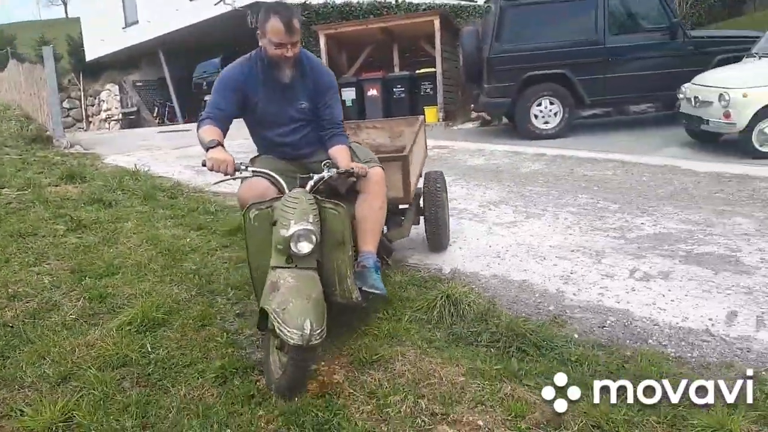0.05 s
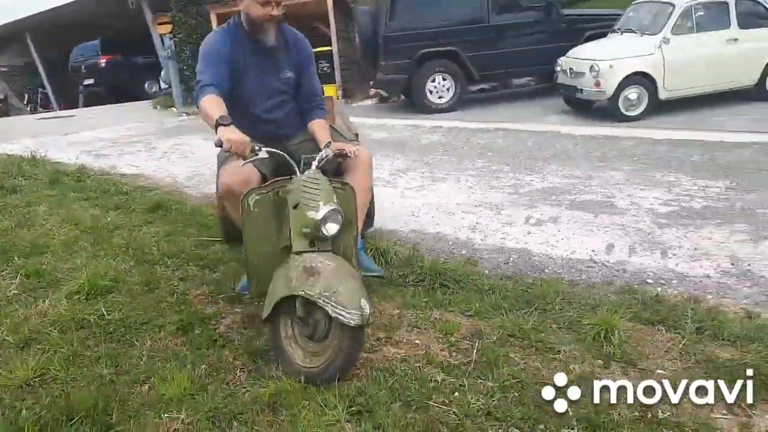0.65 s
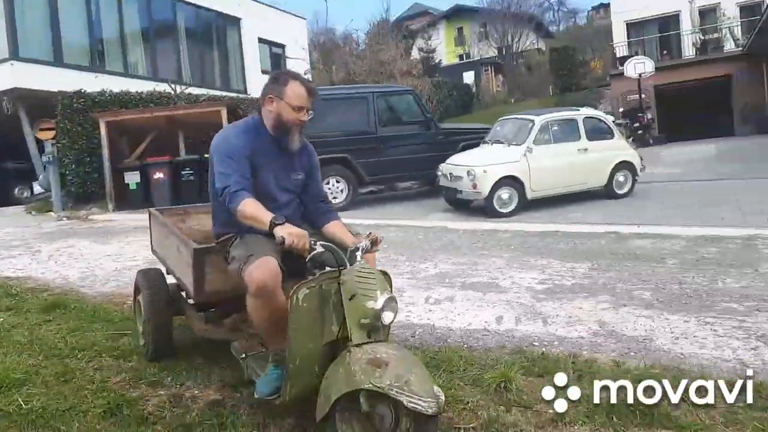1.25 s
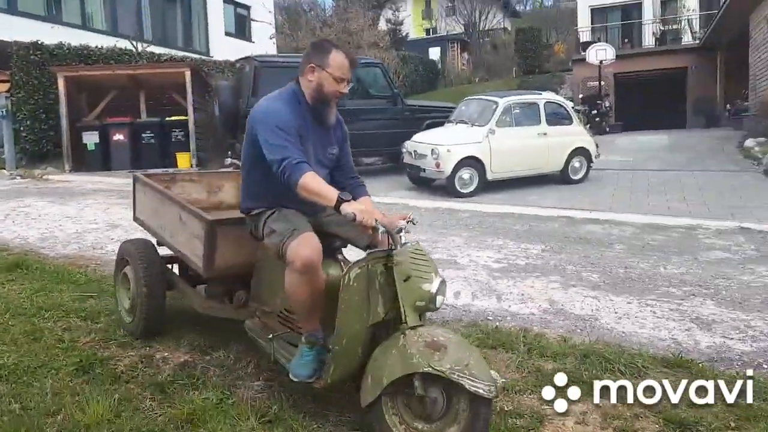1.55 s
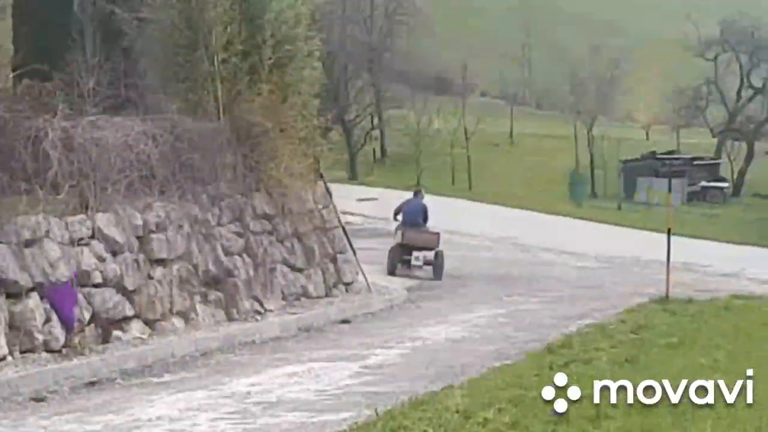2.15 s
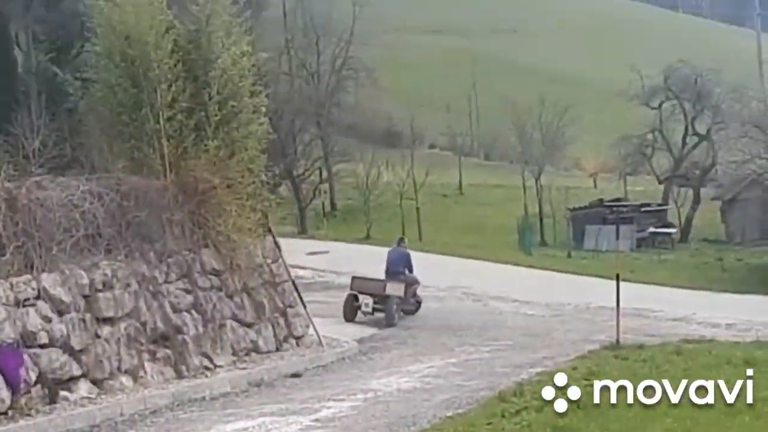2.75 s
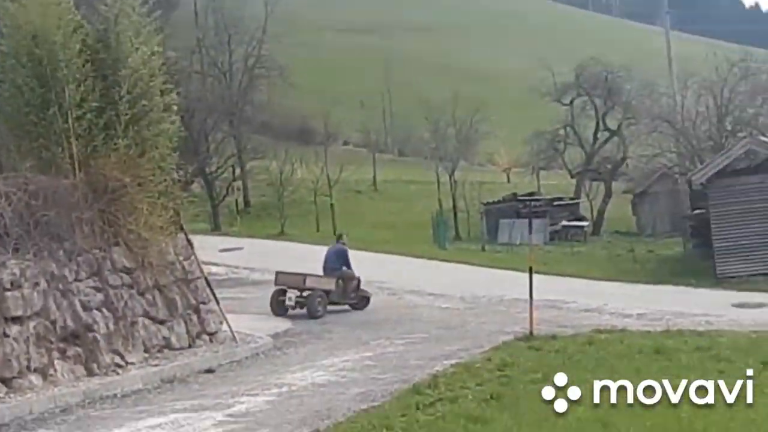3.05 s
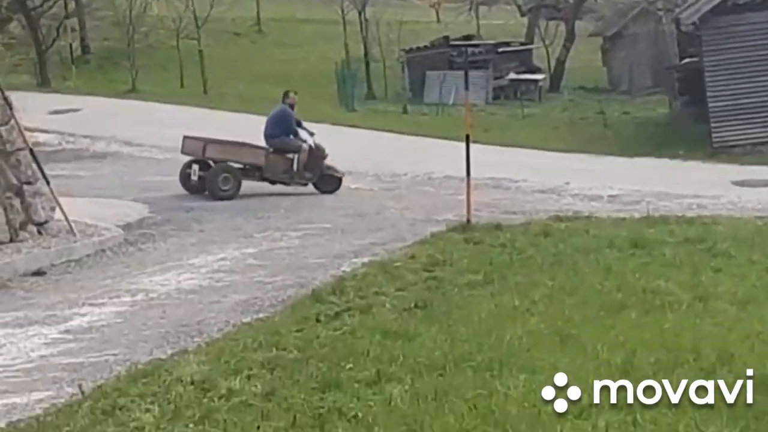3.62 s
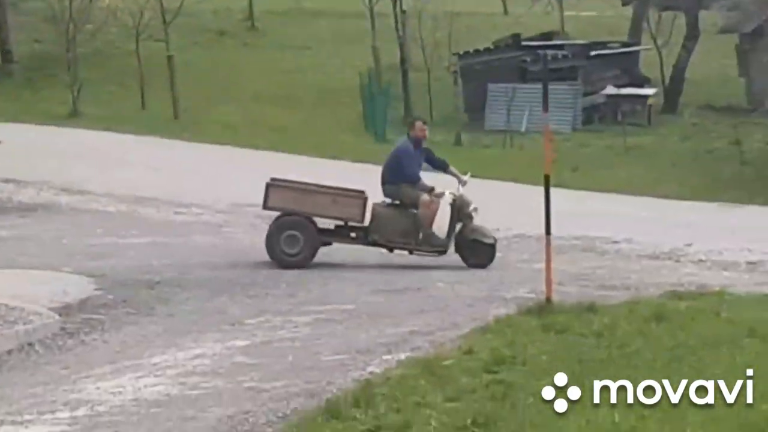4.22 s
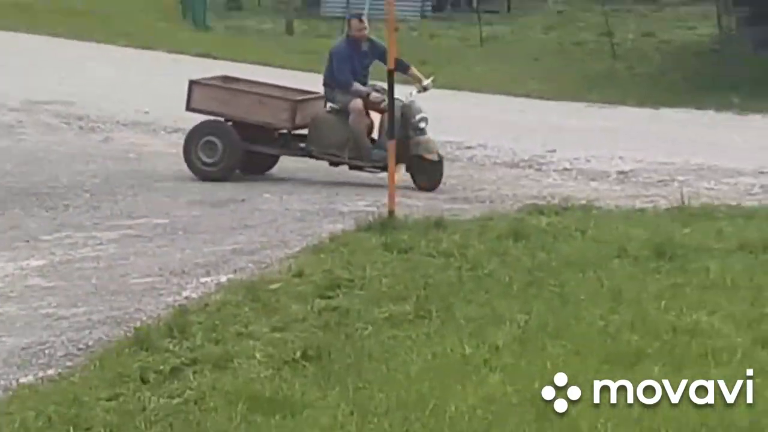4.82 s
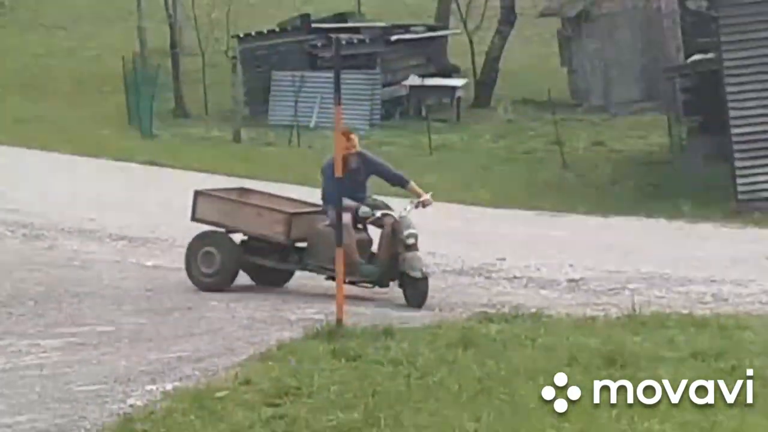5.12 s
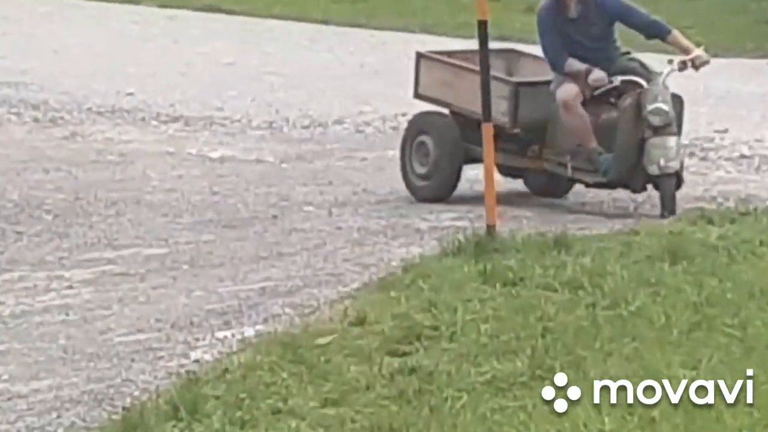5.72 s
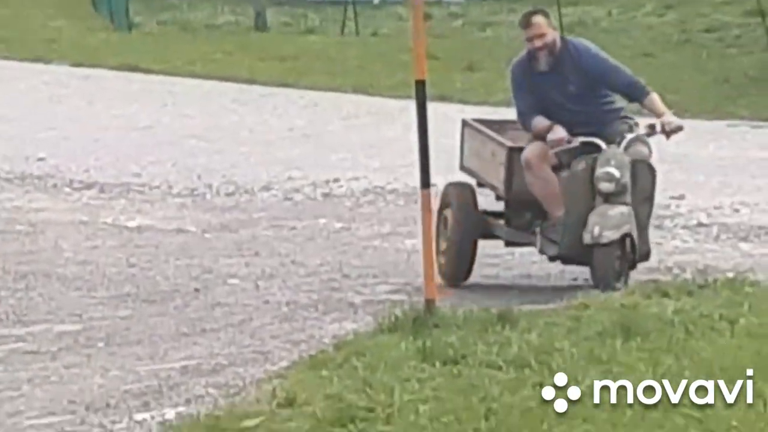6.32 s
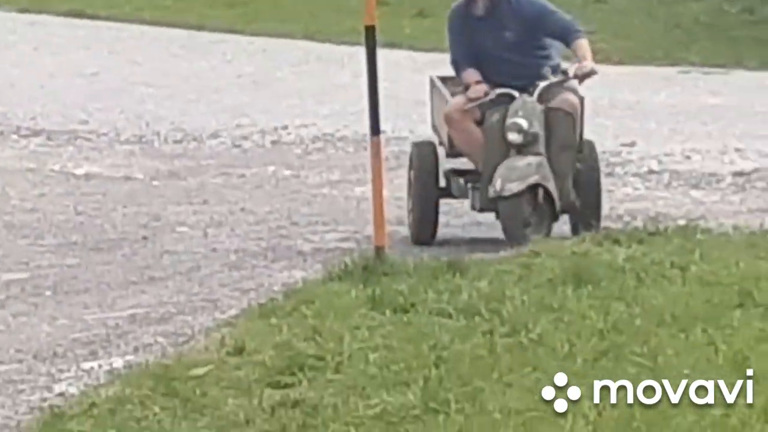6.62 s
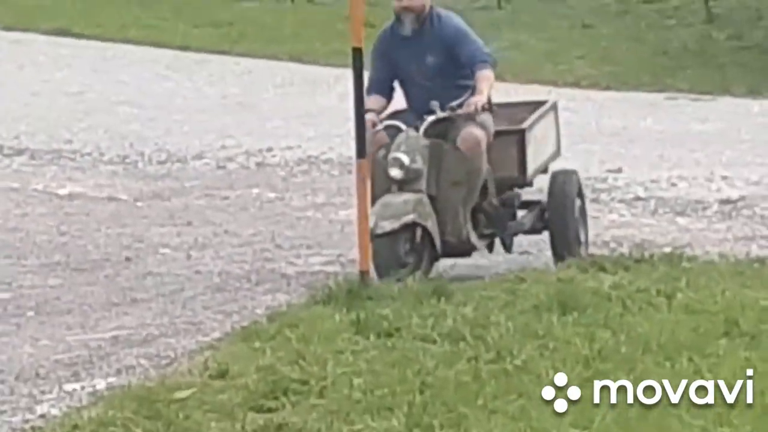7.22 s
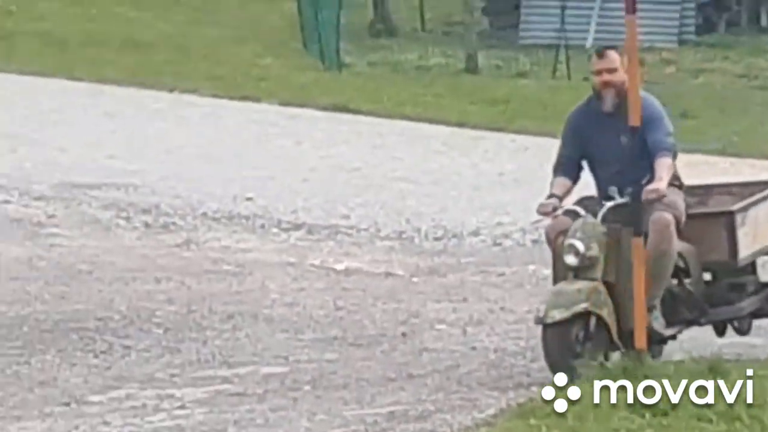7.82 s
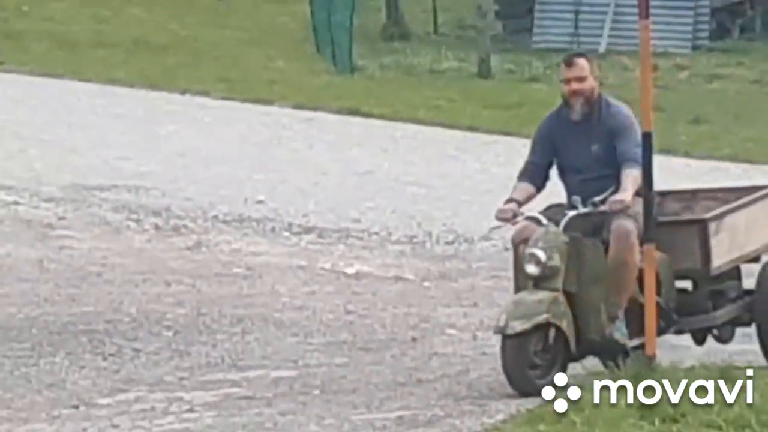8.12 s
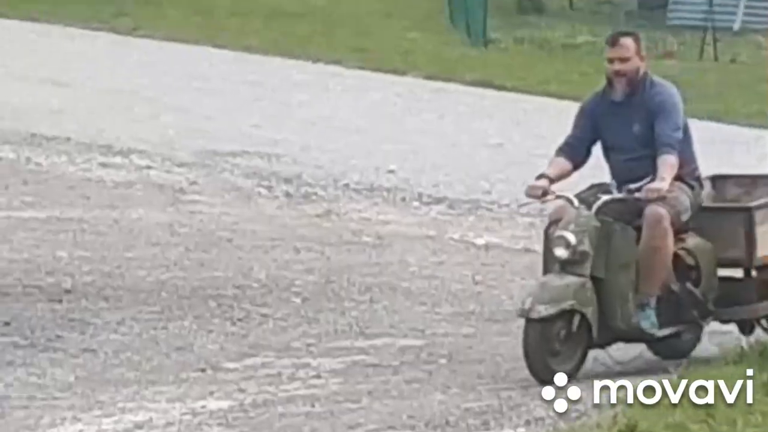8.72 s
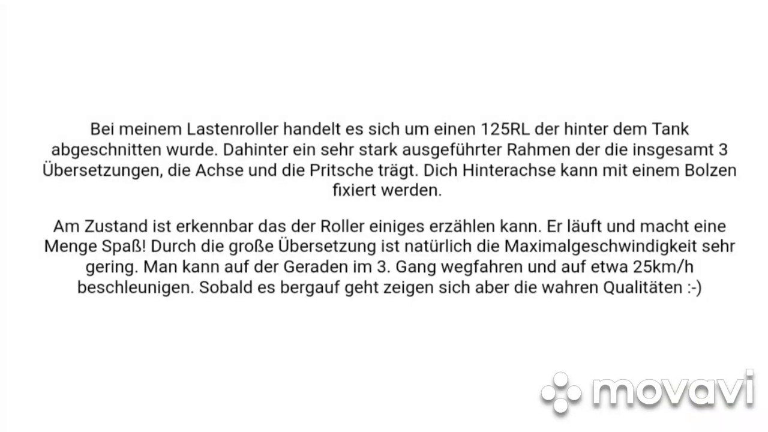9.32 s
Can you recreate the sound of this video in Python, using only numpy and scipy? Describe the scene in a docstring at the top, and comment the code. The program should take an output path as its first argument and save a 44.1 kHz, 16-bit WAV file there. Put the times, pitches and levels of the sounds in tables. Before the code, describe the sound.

An old two-stroke scooter putters and bangs close by, rattling, then is suddenly farther off, coasting on gravel and revving in bursts.

```python
"""An old single-cylinder two-stroke cargo scooter rolls off across a yard, two metres away. Off the
throttle it four-strokes: most turns of the crank only puff, and every few turns one bangs. The fan
hisses, the chain clatters, a loose panel clinks and a dry part squeals. At 2 s, abruptly, it is far down
the lane, coasting and turning round on gravel. From about 4.5 s it revs in little bursts, every turn
firing under the widest throttle, and from about 7 s it sounds nearer."""
import sys
import numpy as np
from scipy import signal
from scipy.fft import rfft, irfft, next_fast_len
from scipy.io import wavfile
from scipy.ndimage import uniform_filter1d, map_coordinates

SR = 44100
rng = np.random.default_rng(int(sys.argv[2]) if len(sys.argv) > 2 else 0)


def transcribe(u):
    """Save the signal u as a 16-bit wav file named by the first command-line argument.

    u: samples, shape (n,) or (channels, n), limited to [-1, 1]; the rate is SR.
    q: integer samples, one column per channel.
    """
    v = np.clip(np.atleast_2d(u).T, -1, 1)
    q = np.round(v * 32767).astype(np.int16)
    wavfile.write(sys.argv[1], SR, q)


N = 412335
T = np.arange(N) / SR
YARD_SPAN_S, LANE_SPAN_S = (0, 1.988), (1.988, 8.965)

# crank speed: (time [s], turns a second [Hz])
YARD_REVS = [(0, 56.7), (0.5, 55.6), (0.8, 57), (1.2, 53.87), (1.75, 45.6), (1.98, 44.9)]
LANE_REVS = [(2.0, 44.74), (2.39, 39.8), (2.56, 36.1), (3.01, 33), (3.14, 34.5), (3.28, 35), (3.76, 43.4),
             (4.1, 43.06), (4.28, 42.14), (4.38, 39.17), (4.58, 38.91), (4.72, 41.04), (5.05, 40.22),
             (5.22, 46.58), (5.42, 46.06), (5.55, 49.54), (5.76, 51.2), (5.92, 57.24), (6.21, 56.34),
             (6.65, 47.1), (6.89, 50.17), (7.09, 55.15), (7.22, 60.37), (7.45, 63.74), (7.59, 58.66),
             (7.76, 50.35), (7.92, 45.95), (8.05, 46.34), (8.33, 49.4), (8.62, 47.55), (8.8, 50.1),
             (8.95, 52)]
# bangs after a run of misses: (time [s], accent [dB])
YARD_BANGS = [(0.072, -3.5), (0.142, 0), (0.156, -1.5), (.21, 2.5), (.301, 2), (0.318, 4.5), (.412, 4),
              (0.486, 2), (0.539, 0), (.557, 0.5), (.575, 0.5), (.593, -5), (0.63, -4.5), (0.645, 1),
              (.699, 3), (.787, 3.5), (0.822, 1), (0.861, 2), (.877, -0.5), (0.95, 4.5), (1.04, 1),
              (1.099, -6), (1.115, 1.5), (1.189, -2), (1.209, -2.5), (1.303, 1.5), (1.377, 1.5), (1.417, 5),
              (1.438, 2.5), (1.516, 5), (1.578, 3), (1.62, -1.5), (1.641, 3.5), (1.704, 1.5), (1.725, -1),
              (1.79, 3), (1.838, 1.5), (1.86, -0.5), (1.905, 3.5), (1.931, 0)]
LANE_BANGS = [(2.0052, -1), (2.1145, 2.5), (2.2314, 2), (2.328, 6), (2.429, 5.5), (2.5372, 7.5),
              (2.6231, 3), (2.653, 4), (2.711, 2.5), (2.7725, 2.5), (2.804, -0.5), (2.895, 1), (2.927, 4),
              (3.013, 4.5), (3.1018, 2.5), (3.218, 1.5), (3.304, -0.5), (3.3872, 2.5), (3.46, 3),
              (3.485, 1), (3.561, 1), (3.632, -2.5), (3.7, -2), (3.722, -2), (3.791, 0), (3.882, -4.5),
              (4.089, -3), (4.115, -3.5), (4.229, -1.5), (4.326, -1.5), (6.2867, -0.5), (6.3603, -0.5),
              (6.419, -3), (6.5158, 2), (6.642, 3), (6.724, 1), (7.5561, -0.5), (7.7148, -1.5), (7.812, -4),
              (7.896, -1)]
# boom of the silencer body: (frequency [Hz], gain [dB])
YARD_SILENCER = [(30, -42), (60, -28), (110, -17), (160, -9), (220, 1), (280, 0), (360, -6), (450, -15),
                 (2400, -100)]
LANE_SILENCER = [(30, -55.5), (60, -37.5), (110, -27.5), (160, -7.5), (205, 0), (245, 8), (300, 6),
                 (335, 4), (380, -16), (440, -27), (600, -19.5), (2400, -100)]
# bark of the tailpipe: (frequency [Hz], gain [dB])
YARD_TAILPIPE = [(40, -50), (150, -25), (400, -3), (500, 0), (680, 4), (830, -1), (960, -18), (1300, -8),
                 (1750, -24.5), (3000, -32.5), (8000, -43)]
LANE_TAILPIPE = [(60, -52), (200, -33), (420, 0.5), (540, -2.5), (610, 0), (680, 2.5), (760, 2), (860, -6),
                 (950, -17), (1060, -9), (1200, -21.5), (1400, -19.5), (1620, -12.5), (1800, -25.5),
                 (2600, -26.5), (6000, -94.5)]
# clatter of engine block, chain and panels: (frequency [Hz], gain [dB])
YARD_CLATTER = [(600, -14.5), (1200, 11.5), (1700, 1.5), (2300, 0.5), (3200, -1), (3800, -1.5),
                (5000, -27.5), (9000, -49)]
LANE_CLATTER = [(100, -22), (500, 6.5), (1100, -1.5), (1600, -3), (1900, -1), (2400, 1.5), (3000, 4),
                (3500, -1), (4200, -29), (8000, -29), (14000, -69)]
# hiss of the cooling fan: (frequency [Hz], gain [dB])
YARD_FAN = [(2500, -17), (3600, -13), (4400, 4.5), (4950, 3.5), (5400, -3.5), (6300, -6), (6900, -5.5),
            (7900, -4), (8600, -13), (12000, -11.5), (15800, -16.5)]
LANE_FAN = [(2500, 5.5), (3600, 7.5), (4400, 3.5), (5100, 0), (5500, -7), (6200, -6.5), (6800, -9),
            (7900, -7.5), (8600, -19), (11000, -23), (15800, -33)]
# ringing fins and sheet metal: (frequency [Hz], width [Hz], gain [dB])
METAL_MODES = [(2800, 45, 2), (3945, 80, -3), (4400, 60, -7.5), (6860, 230, -2.5)]
# bumps shake the chain and panels: (centre [s], length [s], rattle boost [dB])
BUMPS = [(0.03, 0.17, 5), (1.19, 0.16, 6.5), (1.9, 0.34, 3.5), (2.17, 0.51, 3)]
# reflections off ground, trailer and walls: (delay [s], level [dB])
YARD_REFLECTIONS = [(.0078, -31.5), (0.0103, -14), (0.0204, -19), (0.024, -19)]
LANE_REFLECTIONS = [(.0105, -20), (.0315, -20)]
# stereo tilt: (frequency [Hz], left minus right [dB])
YARD_TILT = [(100, 1), (400, 1), (1300, 2), (2400, 3.5), (4400, 0), (5800, 6), (8100, 18), (15000, 23)]
LANE_TILT = [(100, .3), (700, .6), (1300, -.5), (2400, -4), (4400, -3), (8100, 5), (15000, 1.5)]
# clinks of the loose panel: (time [s], relative level [dB], chatter decay [s])
PANEL_HITS = [(0.0737, -15.5, 0.011), (0.2134, -24.5, 0.011), (0.9497, -38, 0.011), (1.041, -26, 0.011),
              (1.2087, -24, 0.011), (1.3019, -22.5, 0.011), (1.3788, -20, 0.011), (1.5184, -19, 0.011),
              (1.5788, -16.5, 0.011), (1.6417, -17.5, 0.011), (1.7045, -19, 0.011), (1.726, -26.5, 0.011),
              (1.7913, -15.5, 0.011), (1.8597, -18, 0.011)]
# ring of that panel: (frequency [Hz], width [Hz], gain [dB])
PANEL_MODES = [(4080, 280, -0.5), (4350, 230, 3.5), (4600, 75, -1.5), (7400, 1900, -24),
               (14000, 2500, -17.5)]
# squeals of a dry rubbing part: (centre [s], length [s], level [dB])
SQUEAL_CUES = [(1.84, 0.13, -28), (3.27, 0.11, -47), (3.48, 0.12, -43), (3.82, 0.14, -39.5),
               (4.012, 0.06, -41), (5.47, 0.088, -39), (8.347, 0.12, -33.5)]
# how far off it sounds, farthest at 6.7 s, and which way it faces:
# (time [s], apparent range [m], heading [degrees; 180 = away, 0 = head-on])
LANE_PERSPECTIVE = [(2, 16.5, 175), (3, 16.9, 108), (3.7, 15, 108), (4.4, 15.7, 65), (5.25, 18, 44),
                    (6.7, 22, -10), (8.96, 13.4, -9)]
# slap off the stone wall beside the lane: (time [s], delay [s], level [dB])
WALL_SLAP = [(2, 0.0086, -24), (4.2, 0.01873, -15), (6, 0.0265, -17), (9, 0.037, -27)]
# tone of the air box: (frequency [Hz], gain [dB])
AIRBOX_TONE = [(25, -56), (45, -26), (75, -14.5), (100, -6), (130, 1), (165, 3.5), (220, 1.5), (400, -27),
               (1500, -100)]
# fader rides for intake drone, rear-chamber note and tailpipe note: (time [s], relative level [dB])
INTAKE_RIDE = [(2.05, -40), (2.1, -41), (4.36, -36.5), (4.41, -44.5), (5.06, -38), (5.44, -53), (5.48, -44),
               (5.62, -44), (5.83, -41), (6.42, -47), (6.46, -47), (7.2, -36), (8.21, -50.5), (8.9, -39)]
CHAMBER_RIDE = [(4.8, -44), (4.89, -54), (4.97, -40.5), (5.76, -37.5), (5.79, -30), (6.15, -39),
                (6.41, -33), (6.6, -38), (7.37, -31), (7.8, -35), (8.9, -32)]
TAILPIPE_RIDE = [(4.15, -40), (5.41, -47), (5.53, -37.5), (5.88, -37), (6.07, -32.5), (6.61, -45),
                 (6.65, -41), (6.69, -40.5), (8.12, -42), (8.17, -34), (8.67, -38), (8.9, -34)]
# crunch of stones under the tyres: (frequency [Hz], gain [dB])
GRAVEL_TONE = [(400, -21), (1200, 12.5), (2200, 8.5), (3100, -10), (3900, -7), (8000, -14.5), (14000, -54)]
# twists of the throttle: (opens [s], closes [s], opening [0-1])
THROTTLE_TWISTS = [(3.117, 4.283, 0.05), (4.504, 5.478, 0.33), (5.437, 6.117, 0.8), (6.63, 7.467, 0.4),
                   (7.87, 8.96, 0.9)]
# jingling chain and front fittings: (frequency [Hz], half width [Hz], gain [dB])
CHAIN_MODES = [(4840, 274, 3.5), (5930, 60, 4.5), (6670, 210, 2), (7270, 450, -1.5)]
FITTING_MODES = [(2940, 320, 11), (3960, 350, 1), (4370, 33.4, 0), (5000, 115, 1), (5570, 88, -10)]

BOOM_LAG_S = 0.0012  # the longer way through the silencer
CRUISE_HZ, LANE_M = 48, 20  # reference revs and range for the lane mix


def undb(db):
    """Decibels to gain."""
    return 10 ** (np.asarray(db) / 20)


def curves(rows):
    """Each column after the time as one value per sample."""
    s, *columns = np.transpose(rows)
    return [np.interp(T, s, column) for column in columns]


def swells(rows):
    """Smooth humps from rows of (centre [s], length [s], height)."""
    return sum(height * np.exp(-(2 * (T - s) / length) ** 2) for s, length, height in rows)


def wander(rate_hz):
    """Slow random drift with a spread of 1."""
    step = int(SR / rate_hz)
    slow = uniform_filter1d(np.repeat(rng.standard_normal(N // step + 1), step), step)[:N]
    return slow / slow.std()


def noise(correlation, size=N):
    """Stereo white noise; a correlation of 1 is mono."""
    mid, side = rng.standard_normal((2, size))
    return np.sqrt((1 + correlation) / 2) * mid + np.sqrt((1 - correlation) / 2) * np.array([side, -side])


def pulses(times, sizes):
    """One impulse at each time."""
    keep = (times >= 0) & (times < T[-1])
    return np.bincount((times[keep] * SR).astype(int), sizes[keep], N)


def decay(x, seconds):
    """Each impulse dies away exponentially."""
    return signal.lfilter([1], [1, -np.exp(-1 / (seconds * SR))], x)


def ring(x, hz, width):
    """One resonance, gain 1 at its centre."""
    return signal.lfilter(*signal.iirpeak(hz, hz / width, SR), x)


def ring_twice(x, hz, width):
    """The same resonance twice over: softer attack, purer note."""
    return ring(ring(x, hz, width), hz, width)


def eq_db(points, size):
    """Spread (frequency [Hz], gain [dB]) points over the bins of a transform."""
    hz, db = np.transpose(points)
    return np.interp(np.log(np.arange(size // 2 + 1) * SR / size + 1), np.log(hz), db)


def convolve(x, response):
    """Pass one or two channels through one or two responses."""
    return signal.fftconvolve(np.atleast_2d(x), np.atleast_2d(response), axes=1)[:, :N]


def body(x, tone, size=8192):
    """Minimum-phase resonator with the given tone: quick attack, ringing tail."""
    cepstrum = irfft(eq_db(tone, size) * np.log(10) / 20)
    cepstrum[1:size // 2] *= 2
    cepstrum[size // 2 + 1:] = 0
    return convolve(x, irfft(np.exp(rfft(cepstrum))))


def steady(x, seconds=0.29):
    """Hold the slow level of the mid channel at 1; single firings keep their punch."""
    window = int(seconds * SR)
    power = uniform_filter1d(uniform_filter1d(x.mean(axis=0) ** 2, window), window // 2)
    return x / np.sqrt(np.abs(power) + 1e-12)


def firing_turns(bang_turns, count, purge_turns=2.7):
    """Four-stroking: burnt gas spoils the charge until a few misses have flushed it out."""
    fires, waited = np.zeros(count, bool), 0
    for turn in range(count):
        waited += 1
        flushed = waited > purge_turns * (.5 + rng.random())
        if turn in bang_turns or (flushed and turn + 1 not in bang_turns):
            fires[turn], waited = True, 0
    return fires


def crank(hz, bangs, four_stroking, fire_db, miss_db, spread_db, jitter_s):
    """Time and strength of each turn's exhaust pulse; four-stroking (0-1) scales the unevenness."""
    phase = np.cumsum(hz) / SR
    bang_s, accent_db = np.transpose(bangs)
    bang_phase = np.interp(bang_s, T, phase)
    bang_turns = np.cumsum(np.round(np.diff(bang_phase, prepend=0))).astype(int)
    phase += np.interp(T, bang_s, bang_turns - bang_phase)  # each bang lands on a whole turn
    times = np.interp(np.arange(int(phase[-1])), phase, T)
    fires = firing_turns(bang_turns, len(times))
    rough = np.interp(times, T, four_stroking)
    db = rough * np.where(fires, fire_db, miss_db)
    db += (0.6 + rough) * spread_db * rng.standard_normal(len(times))
    times += jitter_s * rough * rng.standard_normal(len(times))
    db[bang_turns], times[bang_turns] = accent_db, bang_s
    return times, undb(db)


def exhaust(times, sizes, silencer, tailpipe, sharpness, gas, rush):
    """Each pulse barks in the tailpipe, then booms in the silencer; hard bangs blow turbulent gas."""
    push = pulses(times + BOOM_LAG_S, sizes)
    edge = pulses(times, sizes ** sharpness)
    puff = decay(pulses(times, sizes ** 2), .008)
    boom = body(push + rush * decay(push, 0.11) * noise(1.0), silencer)
    bark = body(edge + gas * puff * noise(0.78), tailpipe)
    return steady(boom), steady(bark)


def shell_hum(times, hz, width, flutter):
    """Every turn, fired or not, keeps the silencer's shell humming."""
    push = pulses(times, np.ones(len(times)))
    return steady(ring_twice(push + flutter * noise(1.0), hz, width))


def scatter(x, t60, shifts_per_s, size=8192):
    """Sound smeared off trailer, road and stones; the paths shift as the scooter moves."""
    s = np.arange(size) / SR
    tail = np.exp(-np.log(1000) * s / t60) * np.minimum(s / .004, 1)
    return steady(sum(convolve(x, noise(.93, size) * tail) * wander(shifts_per_s) for _ in range(5)))


def outdoors(x, reflections, tail_db, t60, correlation, size=16384):
    """Direct sound, a few reflections and a thin scattered tail."""
    s = np.arange(size) / SR
    tail = noise(correlation, size) * np.exp(-np.log(1000) * s / t60) * np.minimum(s / 0.042, 1)
    response = tail * undb(tail_db) / np.linalg.norm(tail[0])
    response[:, 0] += 1
    for delay_s, db in reflections:
        response[:, int(delay_s * SR)] += undb(db)
    return convolve(x, response / np.linalg.norm(response[0]))


def machinery(times, sizes, tone, correlation, knock, knock_s, rattle, flutter_db):
    """Steady whirr, a metallic knock each turn, and loose chain and panels rattling at random."""
    when, force = rng.random((1400, 2)).T
    ticks = pulses(when * T[-1], force ** 3)
    blows = knock * decay(pulses(times, sizes), knock_s) + rattle * decay(ticks, 0.001)
    whirr = noise(correlation) * np.sqrt(1 + blows ** 2) * undb(flutter_db * wander(22))
    metal = sum(undb(db) * ring(whirr, hz, width) for hz, width, db in METAL_MODES)
    return steady(body(whirr + metal, tone))


def panel_clinks(gain_db):
    """Hard bangs shake a loose panel on the engine side, which chatters briefly and rings."""
    shaking = sum(undb(gain_db + db) * decay(pulses(np.array([s]), np.ones(1)), chatter_s)
                  for s, db, chatter_s in PANEL_HITS)
    chatter = shaking * noise(0.4)
    return sum(undb(db) * ring(chatter, hz, width) for hz, width, db in PANEL_MODES)


def squeals(hz, width):
    """Friction catches and slips, scraping one metal resonance in broken chirps."""
    scrape = noise(0.89) * undb(4 * wander(70))
    tone = steady(ring_twice(scrape, hz, width), seconds=0.11)
    return tone * swells([(s, length, undb(db)) for s, length, db in SQUEAL_CUES])


def place(x, tilt, span_s, lag_s):
    """Pan by frequency, delay the right channel and gate the sound to its span."""
    size = next_fast_len(N + 1000, True) // 2 * 2
    ratio = undb(eq_db(tilt, size))
    pan = np.array([ratio, np.ones_like(ratio)]) * 2 / (1 + ratio)
    left, right = irfft(rfft(x, size) * pan)[:, :N]
    right = map_coordinates(right, [(T - lag_s) * SR], order=3)
    gate = np.clip(np.minimum(T - span_s[0], span_s[1] - T) / .004 + .5, 0, 1)
    return np.array([left, right]) * gate


def yard_scooter():
    """Close up: rolling past, throttle nearly shut, slowing down."""
    hz, = curves(YARD_REVS)
    times, sizes = crank(hz, YARD_BANGS, four_stroking=np.full(N, 0.67),
                         fire_db=-6, miss_db=-7.5, spread_db=1.1, jitter_s=.0007)
    boom, bark = exhaust(times, sizes, YARD_SILENCER, YARD_TAILPIPE, sharpness=.9, gas=.04, rush=.006)
    # from the front the tailpipe sounds full; its highest note beams out sideways
    front, flank = swells([(0.7, 0.52, 1)]), swells([(1.71, 0.74, 1)])
    bark = steady(bark + front * ring(bark, 540, 220) + 3.5 * flank * ring(bark, 805, 130))
    bark = steady(bark + undb(-1.5) * scatter(bark, t60=.2, shifts_per_s=7))
    boom = steady(boom + undb(-2) * shell_hum(times, hz=268.3, width=43, flutter=0.017))
    mix = outdoors(undb(-15.5) * boom, YARD_REFLECTIONS, tail_db=-15, t60=.2, correlation=.8)
    mix += undb(-20 + 2 * front) * bark
    clatter = machinery(times, sizes, YARD_CLATTER, correlation=0.35,
                        knock=0.61, knock_s=0.007, rattle=2.4, flutter_db=1.45)
    fan = machinery(times, sizes, YARD_FAN, correlation=0.27,
                    knock=0.99, knock_s=0.015, rattle=0.81, flutter_db=2.2)
    mix += undb(swells(BUMPS)) * (undb(-31) * clatter + undb(-40 + 2.5 * flank) * fan)
    mix += panel_clinks(gain_db=6) + squeals(hz=2860, width=150)
    return place(mix, YARD_TILT, YARD_SPAN_S, lag_s=np.interp(T, [0, 1.2], [.00008, .0002]))


def tailpipe_rasp(bark):
    """The rasp beams backwards and fades as the scooter turns round."""
    rasp_db = np.interp(T, [2, 3.4, 4.8, 5.8, 7], [12, 18, 11.5, 9.5, -59])
    return undb(rasp_db) * (ring(bark, 1520, 160) + 2.6 * ring(bark, 2290, 200))


def wall_echo(x):
    """The slap off the stone wall slides later as the scooter leaves it, sweeping notches in the boom."""
    delay_s, db = curves(WALL_SLAP)
    echo = np.array([map_coordinates(side, [(T - delay_s) * SR], order=1) for side in x])
    return x + undb(db) * echo


def intake_drone(times, lag_turns):
    """The carburettor gulps once a turn between exhaust pulses, fired or not; the air flutters a little."""
    gulps = times[:-1] + lag_turns * np.diff(times)
    push = pulses(gulps, undb(.7 * rng.standard_normal(len(gulps))))
    flutter = .018 * decay(push, .016) * noise(1.0)
    return steady(body(push + flutter, AIRBOX_TONE)) * undb(curves(INTAKE_RIDE)[0] + 2)


def throb(hz, throttle, heading):
    """The fundamental grows with the revs; head-on, under throttle, the air box hums an octave above."""
    phase = 2 * np.pi * np.cumsum(hz) / SR
    fundamental = np.sqrt(2) * np.sin(phase) * undb(-64.5 + 24 * np.log2(hz / CRUISE_HZ))
    head_on = np.exp(-((heading + 8) / 12) ** 2)
    return fundamental + np.sin(2 * phase) * undb(-42.5) * throttle * head_on


def pipe_note(times, sizes, ride, hz, width, trim_db):
    """The pulses ring one narrow resonance; each harmonic sings as the revs carry it through."""
    tone = ring_twice(pulses(times, sizes), hz, width)
    return steady(tone[None]) * undb(trim_db + curves(ride)[0])


def gravel(per_s, clump_db):
    """Stones snap under the tyres in uneven clumps."""
    when, force = rng.random((int(per_s * T[-1]), 2)).T
    snaps = decay(pulses(when * T[-1], force ** 2), .004) * noise(.85)
    return steady(body(snaps * undb(clump_db * wander(19)), GRAVEL_TONE))


def putts(gain_db):
    """A hard bang shoves the gas out of the silencer in one short, round swing."""
    s, accent_db = np.transpose(LANE_BANGS)
    return ring_twice(pulses(s + BOOM_LAG_S, undb(gain_db + accent_db)), hz=255, width=158)


def throttle_opening(rise_s, fall_s):
    """Each twist of the grip rises, holds and is let go."""
    twists = sum(opening * np.clip((T - opens) / rise_s, 0, 1) * np.clip(1 - (T - closes) / fall_s, 0, 1)
                 for opens, closes, opening in THROTTLE_TWISTS)
    return np.clip(twists, 0, 1)


def jingle(modes, per_s, unevenness):
    """Loose metal parts tick at random and ring."""
    when, force = rng.random((int(per_s * T[-1]), 2)).T
    ticks = decay(pulses(when * T[-1], force ** unevenness), 0.026) * noise(0.92)
    return steady(sum(undb(db) * ring_twice(ticks, hz, 2 * half_width) for hz, half_width, db in modes))


def lane_scooter():
    """Far off: coasting, turning round, revving in bursts and sounding nearer from about 7 s."""
    hz, = curves(LANE_REVS)
    range_m, heading = curves(LANE_PERSPECTIVE)
    throttle = throttle_opening(rise_s=0.25, fall_s=0.14)
    octaves = np.log2(hz / CRUISE_HZ)
    rear = (1 - np.cos(np.radians(heading))) / 2
    shadow = np.exp(-((heading - 79.5) / 24.3) ** 2)  # side-on, the bodywork hides silencer and chain

    def fader(db, octave_db, throttle_db, rear_db, shadow_db):
        """A part's gain, ridden by revs, throttle, heading and apparent range."""
        ride_db = octave_db * octaves + throttle_db * throttle + rear_db * rear + shadow_db * shadow
        return undb(db + ride_db) * LANE_M / range_m

    four_stroking = .85 * np.clip(1 - throttle / .52, 0, 1)  # past half throttle every turn fires
    times, sizes = crank(hz, LANE_BANGS, four_stroking,
                         fire_db=-4, miss_db=-7, spread_db=1.3, jitter_s=.0006)
    boom, bark = exhaust(times, sizes ** .8, LANE_SILENCER, LANE_TAILPIPE, sharpness=1.45,
                         gas=.002 + .022 * four_stroking, rush=.0015 + .003 * rear + .003 * four_stroking)
    bark += tailpipe_rasp(bark)
    bark = steady(steady(bark) * undb(5 - 3 * four_stroking) + scatter(bark, t60=.12, shifts_per_s=1.5))
    bark *= undb(-11.5 * np.exp(-(heading / 4.6) ** 2))  # head-on, the leg shield hides the tailpipe
    boom += .6 * four_stroking * shell_hum(times, hz=285, width=90, flutter=.02)
    # under load, hot fast gas brings out one note in the silencer
    boom = steady(boom + undb(-2.4) * throttle * ring(boom, hz=292, width=21))
    engine = (wall_echo(boom) * fader(-28, octave_db=2, throttle_db=-1, rear_db=-2.5, shadow_db=-10.5)
              + bark * fader(-39.5, octave_db=9, throttle_db=0, rear_db=1, shadow_db=-2.5)
              + intake_drone(times, lag_turns=0.485)
              + throb(hz, throttle, heading)
              + pipe_note(times, np.sqrt(sizes), CHAMBER_RIDE, hz=372.3, width=74, trim_db=-0.15)
              + pipe_note(times, sizes, TAILPIPE_RIDE, hz=798, width=60, trim_db=-1.5)
              + putts(gain_db=16.5))
    engine = outdoors(engine, LANE_REFLECTIONS, tail_db=-16, t60=.35, correlation=.9)

    clatter = machinery(times, sizes, LANE_CLATTER, correlation=0.99,
                        knock=0.34, knock_s=0.0039, rattle=0.73, flutter_db=1.0)
    fan = machinery(times, sizes, LANE_FAN, correlation=0.71,
                    knock=.1, knock_s=.005, rattle=1, flutter_db=1.6)
    # a thin top sizzle swells briefly near 3 s, fades, and returns from about 7.4 s
    sizzle = signal.sosfilt(signal.butter(2, 8500, "high", fs=SR, output="sos"), fan)
    fan += sizzle * undb(np.interp(T, [2, 3, 6.9, 7.4, 8.9], [-23, 0, -14, 2, 3]))
    rattles = (clatter * fader(-40.5, octave_db=8, throttle_db=0.5, rear_db=-6, shadow_db=-1.5)
               + fan * fader(-46, octave_db=14, throttle_db=0.5, rear_db=-0.5, shadow_db=-5.5))
    rattles += gravel(per_s=310, clump_db=5) * swells([(4.4, 6.7, undb(-46))])
    turning = swells([(5.3, 2.4, undb(-54.5))])
    nearing = swells([(7.5, 1.3, undb(-40)), (8.8, 1.44, undb(-36))])
    rattles += jingle(CHAIN_MODES, per_s=240, unevenness=1.1) * turning
    rattles += jingle(FITTING_MODES, per_s=420, unevenness=0.26) * nearing
    rattles *= undb(swells(BUMPS) + 0.66 * wander(11))
    rattles += squeals(hz=2810, width=110)
    return (place(engine, LANE_TILT, LANE_SPAN_S, lag_s=np.interp(T, [3.3, 3.7], [.00018, 0]))
            + place(rattles, LANE_TILT, LANE_SPAN_S, lag_s=0))


def scene():
    """Close up in the yard, then a hard cut to far down the lane."""
    return yard_scooter() + lane_scooter()


def record(dry):
    """The microphone rounds the hardest bangs, drops the deepest bass and cuts the top."""
    rounded = np.tanh(.9 * dry) / .9
    thinned = signal.sosfilt(signal.butter(2, 36, "high", fs=SR, output="sos"), rounded)
    return signal.sosfilt(signal.ellip(10, .2, 80, 15850, fs=SR, output="sos"), thinned)


dry = scene()
out = record(dry)
transcribe(out)
```